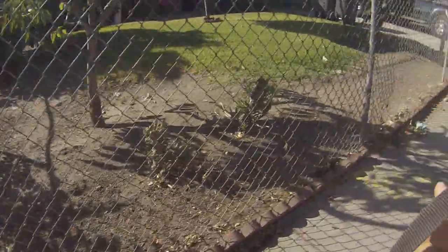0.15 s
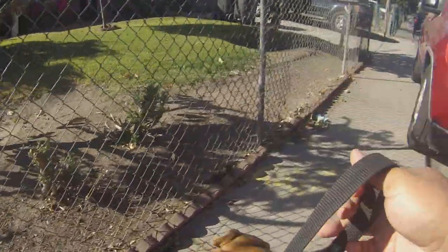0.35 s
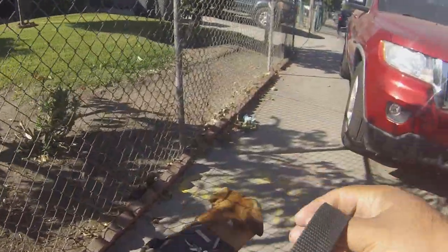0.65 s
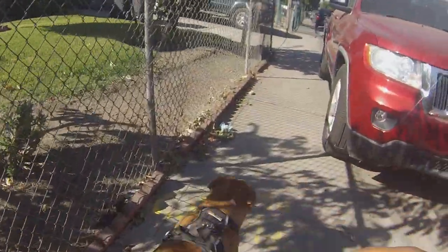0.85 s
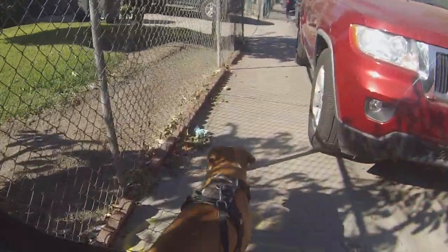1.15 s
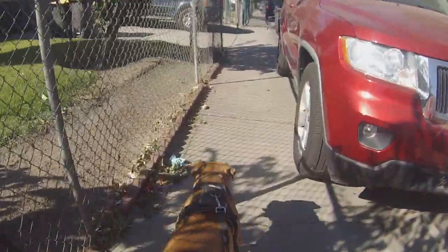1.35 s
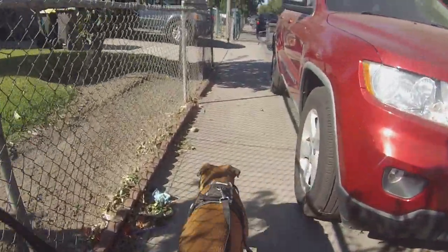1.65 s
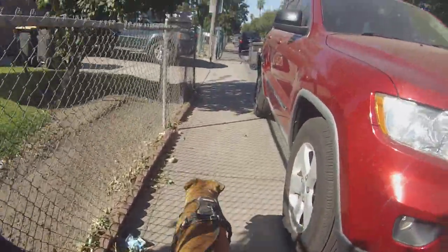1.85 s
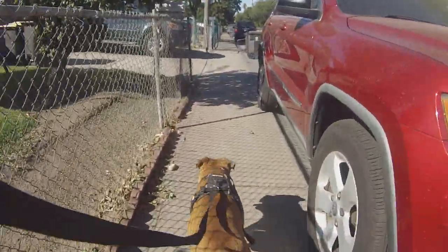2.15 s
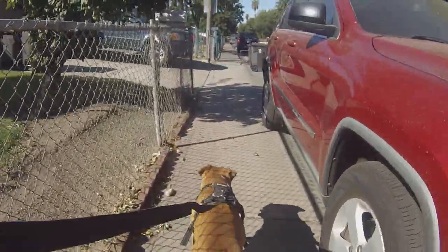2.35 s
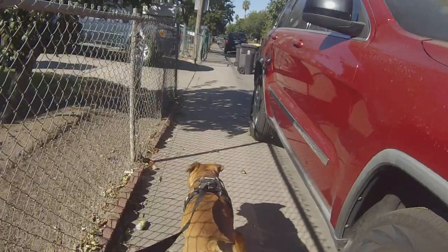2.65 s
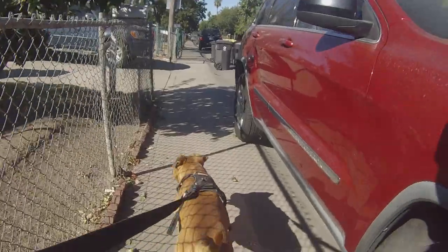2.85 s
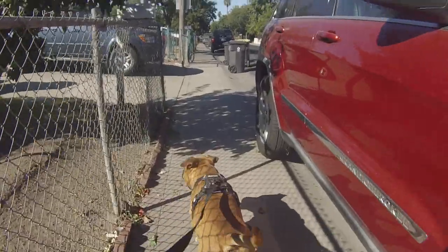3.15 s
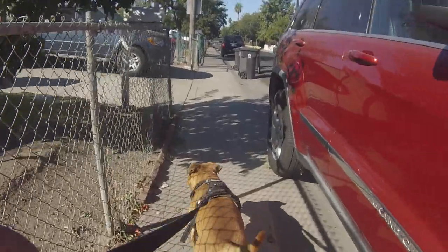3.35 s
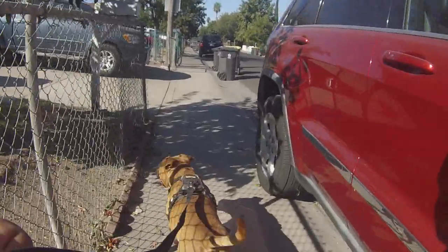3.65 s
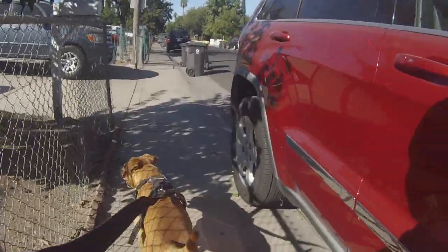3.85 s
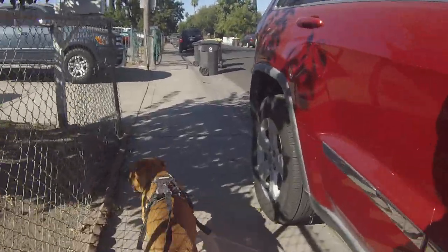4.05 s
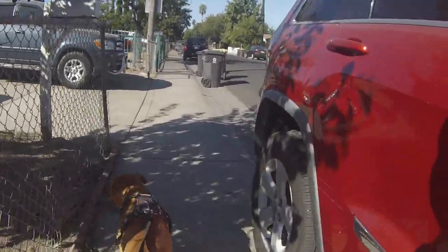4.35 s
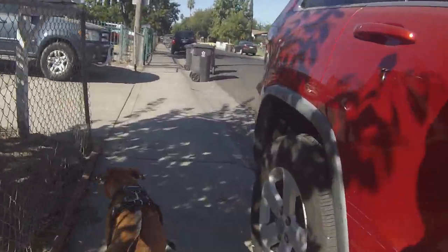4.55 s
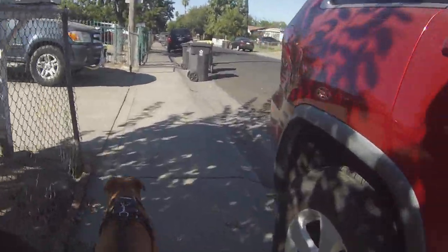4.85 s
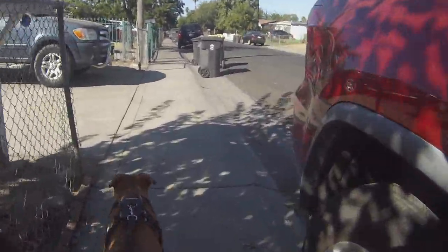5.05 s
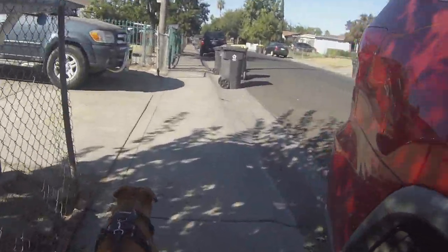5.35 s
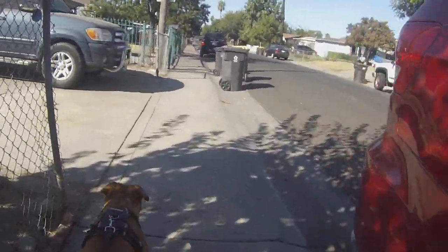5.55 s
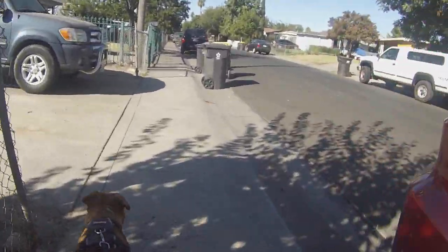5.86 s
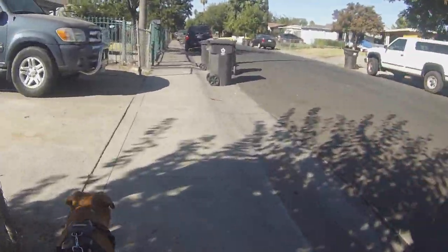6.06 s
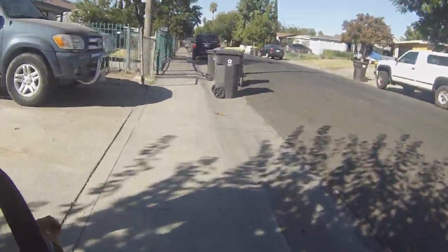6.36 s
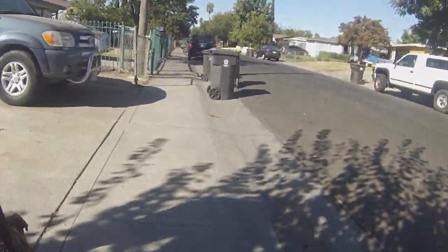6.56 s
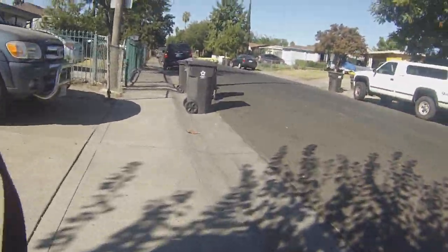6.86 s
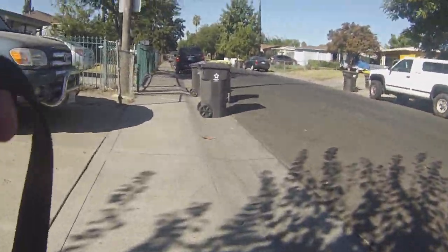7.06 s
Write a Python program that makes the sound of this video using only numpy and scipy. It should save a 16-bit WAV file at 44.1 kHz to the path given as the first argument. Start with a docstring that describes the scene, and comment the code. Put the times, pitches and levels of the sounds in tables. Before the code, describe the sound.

Sharp plastic clacks and hollow knocks dominate, very close, as a camera case rocks on a walking person. One clack comes early, then an uneven run, a sparser stretch and a last cluster. Between them are muffled footfalls, rubbing clothes and leash, and short scrapes on concrete. Farther off, a dog's claws and leash clip tick faintly, with a quiet street hissing softly behind.

```python
"""A concrete pavement on a quiet street: a dog is walked, heard from a body-worn camera in a closed case.
Right at the microphone the plastic case rocks with the strides and clacks against two stops, and its
hinge slips with hollow bumps. Steps, leash and clothes rustle and rumble through it. A leash away, claws
and a metal clip tick faintly and the harness shimmers. The street hisses behind."""
import sys
import numpy as np
from scipy import signal
from scipy.fft import rfft, irfft
from scipy.io import wavfile
from scipy.ndimage import uniform_filter1d

SR = 44100
rng = np.random.default_rng(int(sys.argv[2]) if len(sys.argv) > 2 else 0)


def to_wav(s):
    """Save 16-bit WAV."""
    ch = np.atleast_2d(s).T  # columns
    pcm = np.round(np.clip(ch, -1, 1) * 32767)  # PCM
    wavfile.write(sys.argv[1], SR, pcm.astype(np.int16))


N = 318346

# Resonances and dips of the case round the microphone. Each row: centre in Hz, width in Hz, lift in dB.
CASE_RESONANCES = [(488, 210, -5), (1191, 62, 9), (1415, 110, -4.5), (1800, 80, -0.5), (2160, 55, 5),
                   (2780, 180, -5.5), (3105, 190, 4.5), (3480, 96, -0.5), (3710, 270, -5.5),
                   (4270, 210, 2.5), (4720, 92, -6), (6100, 130, 7), (6300, 340, -3), (7800, 800, -0.5),
                   (8700, 380, 6), (10430, 1000, 8)]
# Spectra before the case colours them. Each row: frequency in Hz, relative density in dB.
STREET_SPECTRUM = [(20, -1), (100, 5), (180, 0.5), (300, 1), (450, -1), (1000, -10), (1900, -13),
                   (2700, -13), (4000, -16.5), (6500, -23), (10500, -32), (12000, -30.5), (15000, -29.5)]
RUB_SPECTRUM = [(60, -8.5), (140, 3), (330, 1.5), (500, -1), (950, -8.5), (1400, -4.5), (1750, 4),
                (2250, -2), (2900, -7.5), (4200, -13), (6000, -21.5), (7500, -32.5), (8700, -27),
                (12000, -44)]
SWAY_SPECTRUM = [(10, -30), (20, 1.5), (30, 3), (55, -12), (80, -12.5), (125, -10), (190, -28.5),
                 (320, -26), (450, -33), (1000, -72)]
HARNESS_SPECTRUM = [(7000, -40), (9300, -8), (10300, 2), (11200, -6), (13000, -13), (15000, -20)]
CLAW_SPECTRUM = [(500, -11), (1500, 7), (3000, -9), (5000, -11), (7500, -17), (10300, -18), (12000, -18),
                 (15000, -24)]
GRIT_SPECTRUM = [(100, 0), (1000, -8.5), (1400, -4.5), (1750, 4), (2250, -2.5), (2900, -9.5), (6000, -22),
                 (12000, -43)]
# Tones of the camera's electronics. Each row: frequency in Hz, rms level in dB.
WHINE_TONES = [(5000, -84), (11000, -97), (12000, -92), (13000, -92), (14000, -96), (15000, -96)]
# The walker's unbroken movement, strongest mid-walk. Each row: time in seconds, relative level in dB.
WALK_EFFORT = [(0.0, -73), (1.37, -62), (1.63, -67.5), (2.09, -53.5), (2.57, -63.5), (2.97, -54.5),
               (7.0, -65), (7.22, -66)]
# Strokes of leash and clothes. Each row: start in seconds, length in seconds, relative level in dB.
CLOTH_STROKES = [(0.302, 0.19, -61.5), (0.678, 0.27, -60.5), (1.12, 0.21, -55.5), (1.741, 0.22, -52.5),
                 (2.083, 0.23, -52.5), (2.717, 0.18, -52.5), (3.036, 0.21, -52), (3.537, 0.33, -54.5),
                 (4.003, 0.55, -55), (4.617, 0.22, -52.5), (4.988, 0.35, -57), (5.642, 0.067, -53),
                 (6.14, 0.24, -59.5), (6.671, 0.32, -55.5)]
# The walker's footfalls, two a second. Each row: time in seconds, relative peak in dB.
FOOTFALLS = [(0.75, -51), (1.22, -50), (1.79, -32), (2.27, -43), (2.79, -43.5), (3.18, -38), (3.69, -34.5),
             (4.125, -33), (4.67, -37), (5.13, -44), (5.69, -41.5), (6.16, -45), (6.73, -39)]
# Ticks of the leash clip. Each row: start in seconds, peak in dB, pitch in Hz.
LEASH_TICKS = [(.142, -57, 11500), (.908, -40.5, 10400), (0.909, -43, 4700), (1.065, -56, 12000),
               (1.372, -58, 12000), (3.605, -51, 10200), (4.154, -47, 9800), (6.628, -42.5, 3600),
               (6.925, -48.5, 11500)]
# Modes of the case. Each row: frequency in Hz, seconds to fall 60 dB, then the signed mode shape
# at the first stop, at the second stop and at the hinge.
CASE_MODES = [(42.4, 0.064, 0.016, -0.2, 0.012), (120.7, 0.053, -0.053, 0.2, 0.088),
              (199, 0.012, -0.095, 0.18, 0.028), (320.7, 0.047, -0.049, 0.088, 0.41),
              (500.3, 0.18, 0.0049, -0.012, 0.023), (735, 0.043, -0.035, 0.055, 0.2),
              (945, 0.006, -0.17, 0.29, 0.31), (1200, 0.048, -0.055, 0.12, 0.12),
              (1254, 0.033, -0.073, 0.097, 0.029), (1609, 0.014, -1.4, 0.48, 0.19),
              (1746, 0.024, 1.317, -0.22, 0.27), (1882, 0.05, 0.13, -0.047, 0.0),
              (2083, 0.018, -0.36, -0.35, 0.27), (2330, 0.0094, 0.34, 0.4, 0.6),
              (2960, 0.018, 0.0124, 0.11, 0.32), (3620.0, 0.032, 0.0107, -0.022, 0.0),
              (4113, 0.019, -0.019, 0.043, 0.19), (4854, 0.018, 0.103, -0.0071, 0.0045),
              (5850, 0.031, 0.0046, -0.0125, 0.0), (7080, 0.0082, -0.023, 0.0042, 0.027),
              (8340, 0.012, 0.072, 0.00046, 0.0), (10800, 0.0054, 0.0211, 0.0111, 0.0)]
# Bumps of the hinge, mostly just ahead of a clack or on a footfall.
# Each row: start in seconds, strength in dB, contact hardness in Hz.
HINGE_BUMPS = [(0.245, -37.5, 1100), (0.7083, -24.5, 1690), (1.7798, -18.5, 1260), (2.189, -33, 900),
               (2.2236, -18.5, 1680), (2.7046, -19, 1600), (3.1461, -25, 1100), (3.157, -39, 1600),
               (3.647, -27, 1500), (3.6691, -22, 1400), (4.095, -19, 1300), (4.1419, -23.5, 1140),
               (4.6233, -24, 1250), (6.7145, -21.5, 2100)]
# Clacks of the rocking case. Each row: start in seconds, strength in dB,
# stop (rounds to 0 for the first, 1 for the second), contact hardness in Hz.
STOP_CLACKS = [(0.7301, -2, 0, 11700), (1.9335, -2, 1, 5030), (2.0184, -4.5, 0, 3850),
               (2.2272, -11.5, 0, 3620), (2.7108, -15, 0, 2580), (2.8864, -1.5, 1, 5240),
               (2.9946, -3.5, 0, 4000), (3.6827, -1.7, 0, 11660), (3.8602, -5, 1, 2330),
               (3.969, -7, 0, 2600), (4.4791, -12.5, 0.83, 1660), (4.662, -8, 0, 12300),
               (5.6701, -11, 0, 3630), (6.725, -9.5, 0.11, 3130), (6.9083, -3.5, 0.99, 4780),
               (6.9753, -4, 0, 4640)]
# Taps too light to rock the case. Each row: start in seconds, strength in dB, stop, hardness in Hz.
STOP_TAPS = [(1.116, -40, 1, 5000), (2.3764, -20.5, 1, 8200), (3.196, -27, 0, 5000), (3.3505, -25, 0, 8000),
             (3.4888, -25.5, 0, 8000), (3.6292, -21, 1, 1930), (4.2735, -24, 1, 8000),
             (4.43, -19.5, 1, 2630), (4.955, -39, 1, 5000), (5.074, -9, 0, 855), (5.444, -40, 1, 5000),
             (5.8234, -30.5, 1, 8000), (5.970, -32.5, 1, 8000), (6.033, -39.5, 1, 12000),
             (6.109, -15, 0, 1060), (6.4586, -32.5, 1, 8000), (6.8724, -24.5, 1, 9000),
             (7.1261, -34, 0, 6000)]
# Scrapes of feet and webbing. Each row: middle in seconds, level there in dB, half width in seconds.
GRIT_SCRAPES = [(0.479, -50.5, 0.0072), (.553, -58, .004), (1.225, -57, 0.0066), (1.328, -49, 0.023),
                (1.429, -51.5, 0.027), (1.66, -53.5, 0.035), (2.125, -49, 0.021), (2.296, -44.5, 0.0053),
                (2.6, -49.5, 0.032), (2.775, -46, 0.021), (3.1, -42, 0.021), (3.812, -47.5, 0.022),
                (5.045, -45, 0.0041), (5.535, -48.5, .006), (6.08, -50, .003), (6.34, -54.5, 0.027),
                (7.11, -56.5, 0.024)]

FIRST_STOP, SECOND_STOP, HINGE = 0, 1, 2
TIME = np.arange(N) / SR


def undb(db):
    """Decibels to gain."""
    return 10 ** (np.asarray(db) / 20)


def unit(x):
    """Scale to rms 1."""
    return x / np.sqrt(np.mean(x ** 2))


def wander(rate):
    """A smooth random curve that takes a new course rate times a second."""
    hold = int(SR / rate)
    return 0.94 * uniform_filter1d(np.repeat(rng.standard_normal(N // hold + 1), hold), hold)[:N]


def swell(start, length, attack_s, release_s):
    """An envelope that reaches 1 at start, holds for length seconds and dies away."""
    t = TIME - start
    return np.exp(np.minimum(t, 0) / attack_s - np.maximum(t - length, 0) / release_s)


def add(track, sound, start_s):
    """Mix a sound into the track at start_s."""
    start = max(int(round(start_s * SR)), 0)
    part = sound[:max(N - start, 0)]
    track[start:start + len(part)] += part


def through_case(x, spectrum):
    """Give x a spectrum and the colour it has at the microphone inside the case, at rms 1."""
    hz = np.maximum(np.arange(N // 2 + 1) * SR / N, 1)
    points_hz, points_db = np.transpose(spectrum)
    db = np.interp(np.log(hz), np.log(points_hz), points_db)
    for centre, width, lift in CASE_RESONANCES:
        db += lift / (1 + (2 * (hz - centre) / width) ** 2)
    return unit(irfft(rfft(x) * undb(db), N))


def street(level_db=-58.5):
    """The street in the background: a low, steady hiss."""
    return through_case(rng.standard_normal(N), STREET_SPECTRUM) * undb(level_db)


def camera_whine():
    """The electronics beside the microphone give faint, steady tones."""
    return sum(np.sqrt(2) * undb(db) * np.sin(2 * np.pi * hz * TIME) for hz, db in WHINE_TONES)


def gait(halt_s=0.0024, rest_s=0.056, rest_power_loss=0.33):
    """The walker's strokes rub and footfalls jolt the mount; gives gain curves for rub and for sway."""
    effort = undb(np.interp(TIME, *np.transpose(WALK_EFFORT)))
    stroke_power = sum((undb(db) * swell(s, length, attack_s=0.015, release_s=0.04)) ** 2
                       for s, length, db in CLOTH_STROKES)
    jolt_power = sum((undb(db) * swell(s, 0, attack_s=0.025, release_s=0.048)) ** 2
                     for s, db in FOOTFALLS)
    # ahead of some clacks the case slides up to its second stop, louder as it nears it
    slide_power = sum((undb(db) * swell(s, 0, attack_s=0.03, release_s=halt_s)) ** 2
                      for s, db, stop, _ in STOP_CLACKS if stop == SECOND_STOP)
    # after a clack it rests on the stop: the motion drops at once and resumes gently
    resting = np.max([swell(s, rest_s, halt_s, release_s=0.028) for s, *_ in STOP_CLACKS], axis=0)
    moving = 1 - rest_power_loss * resting
    rub_power = stroke_power + slide_power * undb(-40) ** 2 + effort ** 2
    sway_power = jolt_power + slide_power * undb(-36) ** 2 + (effort * undb(2)) ** 2
    return np.sqrt(rub_power * moving), np.sqrt(sway_power * moving)


def rustle(rub, grains_per_s=450, grain_mix=0.91, gain_db=0.9, flicker_db=2.5):
    """Leash, clothes and soles scrape close by: a smooth rub with small gritty grains in it."""
    sizes = undb(3.5 * np.minimum(rng.exponential(size=N), 2))  # spread over 7 dB
    grains = (rng.random(N) < grains_per_s / SR) * np.sign(rng.standard_normal(N)) * sizes
    friction = rng.standard_normal(N) + grain_mix * unit(grains)
    return through_case(friction, RUB_SPECTRUM) * rub * undb(gain_db + flicker_db * wander(50))


def rumble(sway, gain_db=-1.0, flicker_db=3.5):
    """The walker's body sways the mount and shakes the case round the microphone."""
    shaking = through_case(rng.standard_normal(N), SWAY_SPECTRUM)
    return shaking * sway * undb(gain_db - flicker_db * wander(36))


def leash_clip(size=2048, t60=0.022, relative_half_width=0.13):
    """The metal clip ticks at the far end of the leash, each tick a burst round its own pitch."""
    hz = np.arange(size // 2 + 1) * SR / size
    decay = undb(-60 * np.arange(size) / SR / t60)
    out = np.zeros(N)
    for s, db, pitch_hz in LEASH_TICKS:
        band = 1 / (1 + ((hz / pitch_hz - 1) / relative_half_width) ** 2)
        tick = irfft(rfft(rng.standard_normal(size)) * band) * decay
        add(out, undb(db) * tick / np.abs(tick).max(), s)
    return out


def harness(strides_per_s=3.5, first_stride_s=0.155, sharpness=2.5, level_db=-79.5, flicker_db=3.0):
    """A leash away, the harness's thin, high shimmer swells with each even stride of the dog."""
    stride = np.abs(np.cos(np.pi * strides_per_s * (TIME - first_stride_s))) ** sharpness
    shimmer = through_case(rng.standard_normal(N), HARNESS_SPECTRUM)
    return shimmer * stride * undb(level_db + flicker_db * wander(40))


def claws(count=44, steps_per_s=6.4, t60=0.035, scatter_db=2, level_db=-73):
    """Claws scratch softly on the concrete below in a loose trot, muffled by the case."""
    scratch = undb(-60 * np.arange(2048) / SR / t60)
    envelope = np.zeros(N)
    for step, (late, force) in enumerate(rng.standard_normal((count, 2)), start=1):
        add(envelope, scratch * undb(scatter_db * force), (step + late / 10) / steps_per_s)
    return through_case(envelope * rng.standard_normal(N), CLAW_SPECTRUM) * undb(level_db)


def case_knock(place, hardness_hz, bass_cut_hz, size=16384, detune=0.0081, scatter_db=0.66):
    """One contact rings the modes of the case; the place that is hit decides their mix."""
    t = np.arange(size) / SR
    mode_hz, t60, *shapes = np.transpose(CASE_MODES)
    mode_hz = mode_hz * (1 + detune * rng.standard_normal())
    modes = undb(-60 * t / t60[:, None]) * np.sin(2 * np.pi * np.outer(mode_hz, t))
    weights = shapes[place] * undb(scatter_db * rng.standard_normal(len(CASE_MODES)))
    # a soft contact pushes longer and loses treble; a light one hardly rocks the whole case
    jf = 1j * np.arange(size // 2 + 1) * SR / size
    push = (jf / (jf + bass_cut_hz) / (1 + jf / hardness_hz)) ** 2
    if place == FIRST_STOP:  # catches twice in quick succession
        rebound_s, rebound_share = 0.0003084, 0.7
        push *= 1 + rebound_share * np.exp(-2 * np.pi * jf * rebound_s)
    if place == HINGE:  # slips smoothly, so the treble falls steeply
        slip = jf / (0.77 * hardness_hz)
        push /= 1 + slip + slip ** 2
    return irfft(rfft(weights @ modes) * push)


def rocking_case(gain_db=1.74, shell_hz=9000):
    """Clacks, hinge bumps and taps right at the microphone; the plastic shell dulls their top."""
    out = np.zeros(N)
    for s, db, stop, hardness_hz in STOP_CLACKS:
        add(out, undb(db) * case_knock(round(stop), hardness_hz, bass_cut_hz=18), s)
    for s, db, hardness_hz in HINGE_BUMPS:
        add(out, undb(db) * case_knock(HINGE, hardness_hz, bass_cut_hz=62), s)
    for s, db, stop, hardness_hz in STOP_TAPS:
        add(out, undb(db) * case_knock(round(stop), hardness_hz, bass_cut_hz=166), s)
    shell = signal.butter(2, shell_hz, fs=SR, output="sos")
    return signal.sosfilt(shell, out) * undb(gain_db)


def scuffs(grains_per_s=700, scatter_db=3.0):
    """Feet and webbing scrape nearby, each scrape a short swell of grit grains."""
    scrapes = sum(undb(db) * np.exp(-((TIME - s) / width) ** 2) for s, db, width in GRIT_SCRAPES)
    grains = (rng.random(N) < grains_per_s / SR) * np.sign(rng.standard_normal(N))
    sizes = undb(scatter_db * rng.standard_normal(N))
    return through_case(grains * sizes, GRIT_SPECTRUM) * scrapes


def scene():
    """Dog, walker, case and street at the one body-worn microphone."""
    rub, sway = gait()
    dog = leash_clip() + harness() + claws()
    walker = scuffs() + rustle(rub) + rumble(sway)
    return (dog + walker + rocking_case() + street() + camera_whine())[None]


def record(dry, top_hz=15200):
    """The camera cuts the highest treble steeply."""
    return signal.sosfilt(signal.ellip(10, .1, 70, top_hz, fs=SR, output="sos"), dry)


dry = scene()
out = record(dry)
to_wav(out)
```